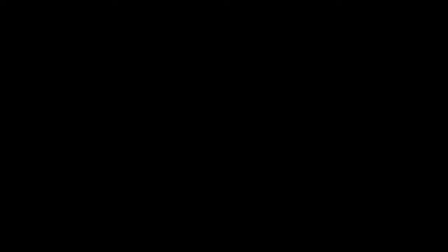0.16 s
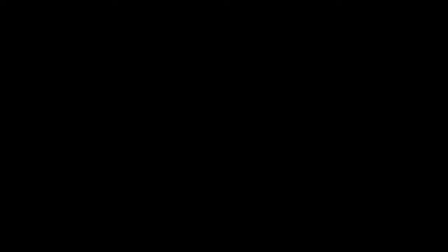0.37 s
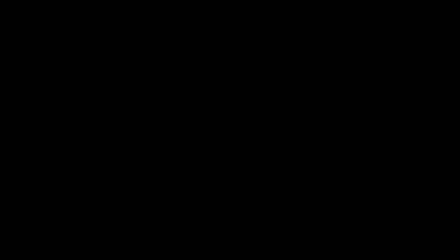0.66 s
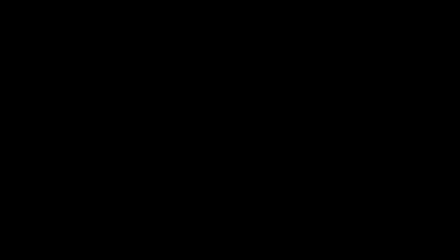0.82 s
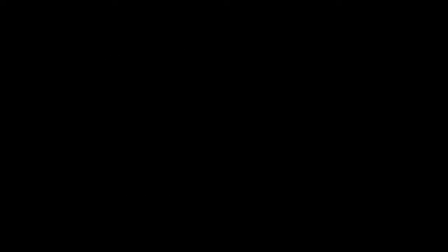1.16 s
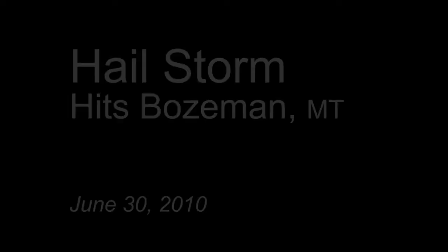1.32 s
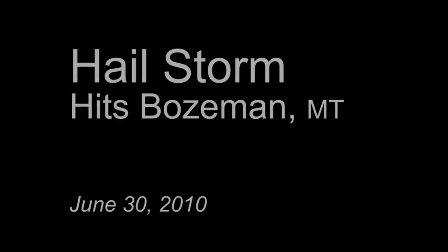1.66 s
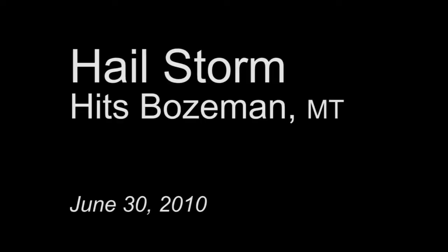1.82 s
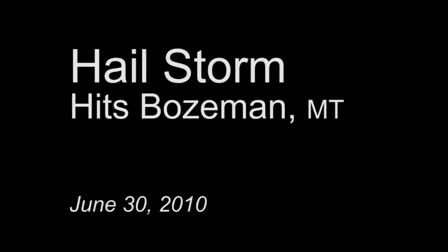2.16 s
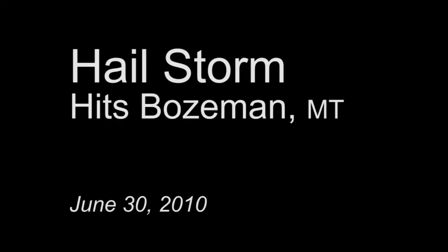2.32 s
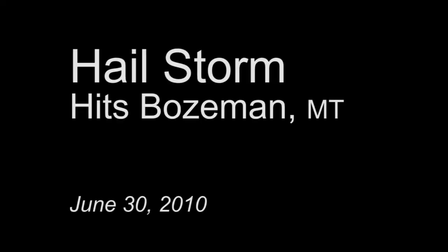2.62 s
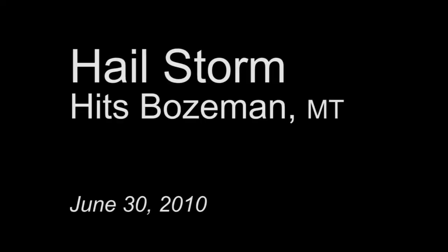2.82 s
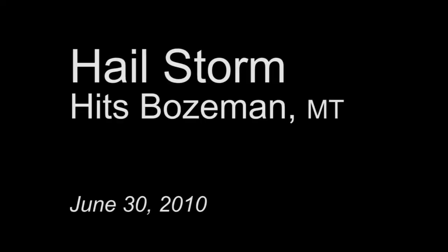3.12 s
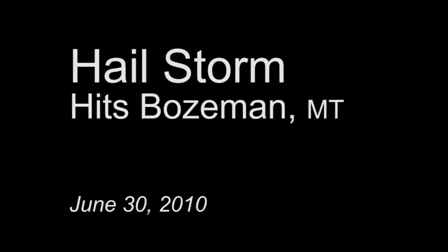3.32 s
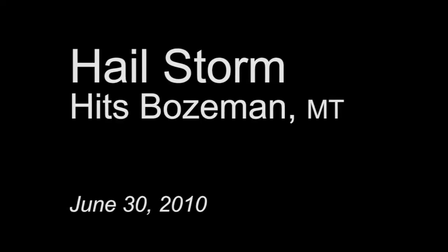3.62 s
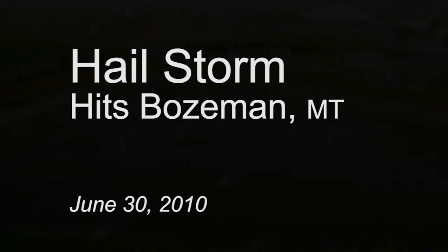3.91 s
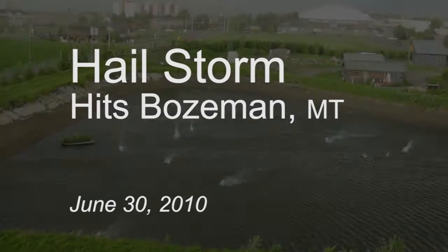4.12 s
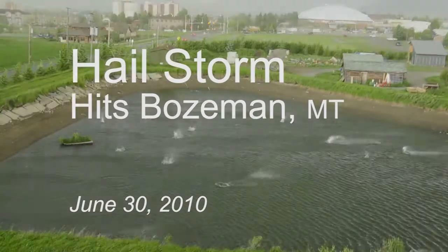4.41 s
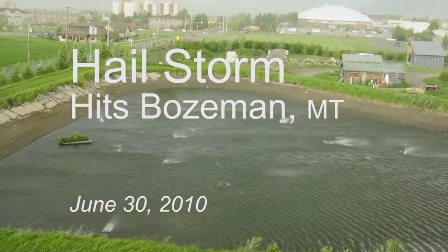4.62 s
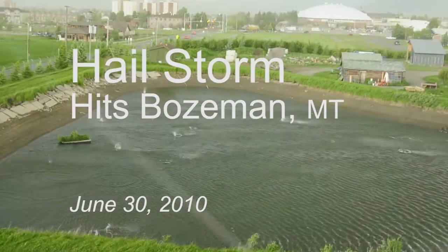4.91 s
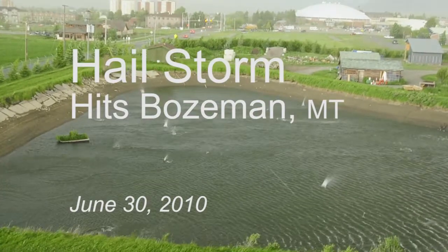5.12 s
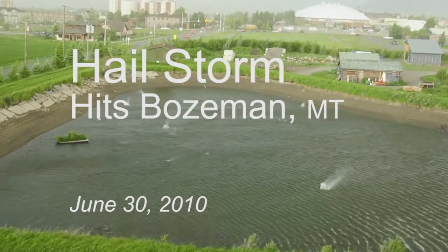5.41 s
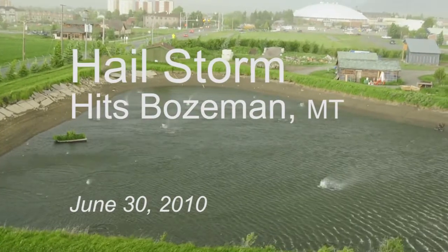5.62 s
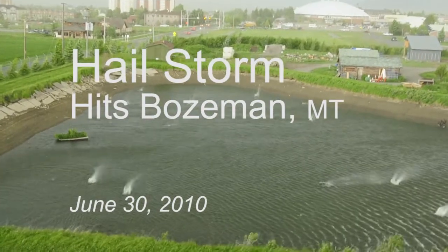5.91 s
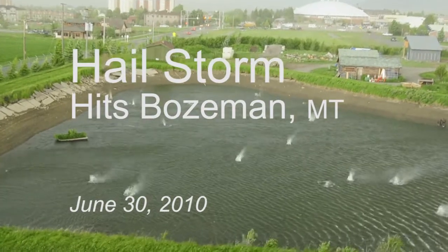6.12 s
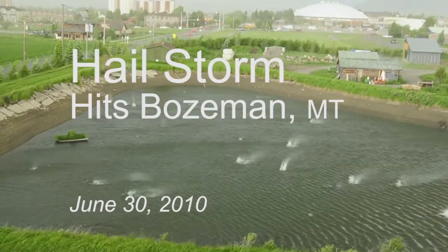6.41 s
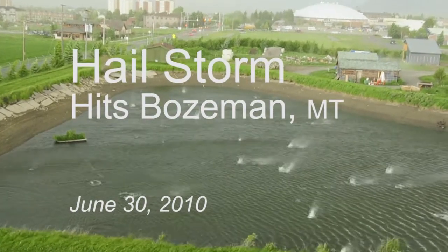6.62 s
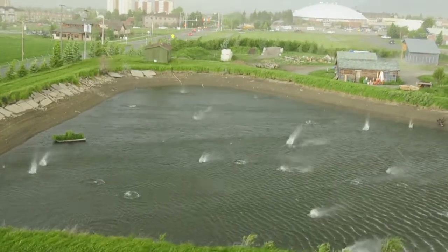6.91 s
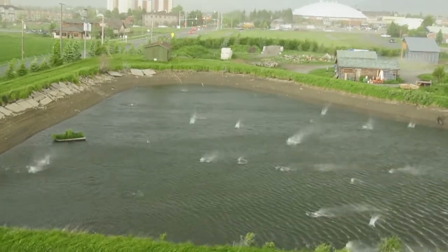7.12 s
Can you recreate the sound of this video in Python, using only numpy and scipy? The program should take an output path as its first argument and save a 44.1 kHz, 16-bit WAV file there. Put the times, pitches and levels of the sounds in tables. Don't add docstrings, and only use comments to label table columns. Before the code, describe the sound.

Large hailstones bang irregularly on a ringing sheet-metal roof overhead, over low rumbling wind and a soft distant patter of hail, the loudest hits distorting.

```python
import sys
import numpy as np
from scipy import signal
from scipy.fft import irfft
from scipy.io import wavfile

SR = 44100
rng = np.random.default_rng(int(sys.argv[2]) if len(sys.argv) > 2 else 0)


def pcm_store(signal):
    levels = np.round(np.clip(np.atleast_2d(signal), -1, 1) * 32767)
    wavfile.write(sys.argv[1], SR, levels.astype(np.int16).T)


def elevation(decibels):
    levels = np.asarray(decibels, float)
    return 10 ** (levels / 20)


N = 320166
STEP = 32
TIME = np.arange(N // STEP + 2) * STEP / SR
BANDS = np.geomspace(22, 6600, 34)
CENTRES = np.sqrt(BANDS[1:] * BANDS[:-1])

# time in seconds, wind rumble in dB, far hail in dB.
STORM = [(0.0, -26.5, -39.5), (0.399, -29.5, -49), (1.25, -22, -37.5), (1.9, -25, -38), (2.47, -22, -36),
         (3.09, -25.5, -45.5), (3.48, -22.5, -46), (3.78, -23.5, -42), (4.16, -19.5, -33), (4.45, -23, -42),
         (4.65, -20.5, -35), (5.05, -24, -36), (5.5, -23, -45), (5.9, -21.5, -35.5), (6.35, -18.5, -37),
         (6.61, -22.5, -30.5), (6.981, -20.5, -42), (7.26, -23.5, -37)]
# frequency in Hz, density in dB per Hz.
RUMBLE = [(15, -51.5), (25, -10), (97, -12), (146, -3), (209, -4), (280, 0.5), (338, 0.5), (375, -2.5),
          (452, -2), (682, -8), (824, -11.5), (1500, -20), (1950, -52.5), (3300, -120)]
# frequency in Hz, density in dB per Hz.
FAR_HAIL = [(710, -36.5), (1200, -4), (2350, -4), (3860, -20), (4820, -35), (5260, -40.5), (6840, -77),
            (11600, -120)]
# start in seconds, peak in dB, brightness in
# dB per octave.
FAINT = [(0.0376, -26, 12), (0.2523, -27, -3.5), (0.6574, -30, 0.6), (0.9904, -20.5, 7), (1.127, -27.5, 2),
         (1.1513, -21, 4), (1.7494, -16, -3.5), (1.813, -32, 3), (1.849, -30.5, 0), (2.0176, -27.5, -4.5),
         (2.0482, -23, 1), (2.1201, -30, 13), (2.1824, -20, -9), (3.1786, -28, -11.5), (3.2011, -17, -9),
         (3.706, -21, -11.5), (3.721, -21, -1), (3.813, -19.5, 2), (3.9544, -26.5, -10), (5.0399, -23, -14),
         (5.0699, -17.5, -8), (5.144, -25.5, -1), (5.261, -18, -4), (5.7628, -35, -9), (6.4388, -22, -16),
         (6.7431, -26, -10), (6.77, -18, -8), (6.822, -22, -6.5), (6.8568, -16, -2.5), (7.173, -20, -12)]
# start in seconds, peak in dB, brightness in dB per octave, ring t60 in seconds.
NEAR = [(0.3591, 1, 9, 0.34), (1.1921, 1, 3, 0.37), (1.4457, -12, 0, 0.33), (1.5599, -0.8, 0, 0.38),
        (2.385, -4.5, -4, 0.25), (2.4438, 0, 8, 0.37), (2.468, 1, 2.4, 0.27), (2.884, -6, -0.87, 0.34),
        (3.265, 3, 5.5, 0.29), (3.5074, -12.5, 3, 0.4), (4.174, -0.5, 12, 0.23), (4.2145, 1, 2, 0.38),
        (4.4448, -4.5, -6.5, 0.32), (4.4927, -8.5, -5, 0.37), (4.582, 5, 1, .19), (5.3281, 13.5, 7.5, 0.11),
        (5.467, 4, 8.2, 0.35), (5.4893, -8.5, -2.5, 0.7), (5.5232, 7.5, 4, 0.24), (6.176, 0.7, 12.5, 0.32),
        (6.2591, -0.6, 11, 0.3), (6.551, 3, 2.5, 0.35), (6.916, -1.9, 2.5, 0.41), (2.8327, -6, -6, 0.27)]
# start in seconds, peak in dB, brightness in dB per octave,
# ring t60 in seconds.
FAR = [(0.7959, -3, 2.1, 0.3), (1.035, -13.5, -3, 0.53), (1.6696, -10, -4.5, 0.3), (2.2643, 4, 4, 0.35),
       (2.2894, -1.3, 6, 0.13), (3.4243, -2, -5.5, 0.14), (3.435, 0.3, -2.5, 0.21),
       (3.7566, -16.5, -1.5, 0.46), (3.9835, 4, -4, 0.28), (4.0612, -11, 4, 0.33), (4.3254, 5, 4.5, 0.31),
       (4.349, -11.5, 17, 0.34), (4.5321, -2, -1.1, 0.53), (4.6904, -11.5, 1.1, 0.2),
       (4.897, -3.5, -5, 0.24), (5.301, -2.2, -0.5, 0.29), (5.3614, -12.5, 3, 0.57),
       (5.8428, -20.5, 21, 0.31), (5.904, -3.5, -1.1, 0.29), (6.0693, 6, -3.5, 0.24),
       (6.1477, -12, 2, 0.36), (6.508, -17.5, -2.5, .21), (7.0285, -12, -2, 0.22)]
# frequency in Hz, density in dB per Hz.
SHEET = [(530, -36.5), (900, -5.5), (1230, -6), (1340, -0.5), (1580, -1.5), (2280, -0.5), (3090, -6),
         (5260, -44.5), (6840, -59), (11600, -120)]
# frequency in Hz, share of the ring t60 as a ratio.
SHEET_DECAY = [(150, 4.75), (500, 1.65), (1200, 0.87), (2300, 0.99), (4000, 0.88), (5400, 0.17)]
# frequency in Hz, density in dB per Hz.
BOOM = [(100, -22.5), (170, -1.5), (350, -1), (700, 1), (1100, -5.5), (1600, -21.5)]
# frequency in Hz, level in dB, t60 in seconds.
PANELS = [(171.7, -30, 0.99), (302.9, -28.5, 0.63), (410.7, -25, 0.36), (679, -28.5, 0.46),
          (1086, -29.5, 0.18), (1786, -22, 0.21), (2140, -32.5, 0.077), (2150, -19.5, 0.2),
          (2307, -21, 0.21), (3040, -30.5, 0.1), (2870, -30, 0.086), (3320, -32, 0.077)]
# start in seconds, level in dB, frequency in Hz, t60 in seconds.
ICE_CHIP = (2.24, -21, 3250, .03)
# start in seconds, peak in dB.
RAFTER = [
    (2.384, -3.5),
    (4.446, -5),
    (4.4915, -7),
]
# start in seconds, level in dB.
CRACKLES = [
    (3.483, -23),
    (6.457, -26),
    (7.252, -23),
]

NEAR_BLOWS = [(*row, 1.37) for row in NEAR]
FAR_BLOWS = [(*row, 4.53) for row in FAR]
FAINT_BLOWS = [(*row, 0.17, 4.3) for row in FAINT]
# start in seconds, peak in dB, boom in dB,
# brightness in dB per octave, rise in ms, ring t60 in seconds.
STONES = [(s, db, -12.5 - 0.041 * bright - 0.07 * db, bright, rise_ms, t60)
          for s, db, bright, t60, rise_ms in NEAR_BLOWS + sorted(FAR_BLOWS + FAINT_BLOWS)]


def at_hz(points, hz):
    known_hz, value = np.array(points).T
    return np.interp(np.log(hz), np.log(known_hz), value)


def drift(rate_hz, count=1):
    settle = 2000
    r = np.exp(-2 * np.pi * STEP * rate_hz / SR)
    white = rng.standard_normal((count, len(TIME) + settle))
    slow = signal.lfilter([1], [1, -2 * r, r * r], white)[:, settle:]
    return slow / slow.std(axis=1, keepdims=True)


def ring(clicks, hz, t60):
    r = elevation(-60 / (t60 * SR))
    w = 2 * np.pi * hz / SR
    return signal.lfilter([0, np.sin(w)], [1, -2 * r * np.cos(w), r * r], clicks + 1e-18)


def band_power(spectrum, tilt_db=0):
    density = elevation(2 * (at_hz(spectrum, CENTRES) + tilt_db))
    return density / (density @ np.diff(BANDS)) * SR / 2


def noise_bands(power):
    white, out = rng.standard_normal((2, N)), 0
    for k, edge in enumerate(zip(BANDS, BANDS[1:])):
        bandpass = signal.butter(2, edge, "band", fs=SR, output="sos")
        band = signal.sosfilt(bandpass, white[k % 2])
        out = out + band * np.interp(np.arange(N) / STEP, np.arange(len(TIME)), np.sqrt(power[k]))
    return out


def storm(rumble_patchy_db=1.5, hail_patchy_db=0.5):
    s, *controls = np.transpose(STORM)
    wind_db, hail_db = (np.interp(TIME, s, c) for c in controls)
    gusts = rumble_patchy_db * (0.55 * drift(10.0) + drift(13, count=len(CENTRES)))
    patter = hail_patchy_db * (drift(18) + 0.7 * drift(25, count=len(CENTRES)))
    rumble = band_power(RUMBLE)[:, None] * elevation(2 * (wind_db + gusts))
    far_hail = band_power(FAR_HAIL)[:, None] * elevation(2 * (hail_db + patter))
    return rumble + far_hail


def arrival_s(hz):
    spread_s = 0.026
    return spread_s * (1 / np.sqrt(np.maximum(hz, 900) / 1000) - 1 / np.sqrt(4.5))


def first_waves(wave_db=6.0):
    size, lead_s = 4096, 1 / 200
    out = np.zeros(N + size)
    hz = np.maximum(np.arange(size // 2 + 1) * SR / size, 1)
    turns = np.cumsum(arrival_s(hz)) * SR / size
    luck = rng.random((len(STONES), 3))
    for (s, db, boom_db, bright, rise_ms, t60), u in zip(STONES, luck):
        first_edge = 0.5 * np.exp(-2j * np.pi * hz * (0.002033 + 0.003 * u[0]))
        second_edge = -0.35 * np.exp(-2j * np.pi * hz * (0.0084 + 0.0091 * u[1]))
        colour = elevation(at_hz(SHEET, hz) + (0.88 * bright + 6.0) * np.log2(hz / 2300))
        path = np.clip(0.82 + 0.15 * bright, 0.1, 0.7)
        chirp = np.exp(-2j * np.pi * (path * turns + hz * lead_s + u[2]))
        wave = irfft(colour * (1 + first_edge + second_edge) * chirp)
        at = round((s - lead_s) * SR)
        peak_db = db + wave_db - 2.17 * rise_ms
        out[at:at + size] += wave / np.abs(wave).max() * elevation(peak_db)
    return out[:N]


def sheet_ring(ring_db=-9.5, boom_gain_db=-3.5, early_db=4.0, late_db=-29.5, spotty_db=2.0, rattle_db=1.67):
    power = np.zeros((len(CENTRES), len(TIME)))
    spots = rng.standard_normal((len(STONES), len(CENTRES)))
    for (s, db, boom_db, bright, rise_ms, t60), spot in zip(STONES, spots):
        a = int(s * SR / STEP) - 20
        span = slice(a, a + int(0.9 * SR / STEP))
        lead = 0.028 * arrival_s(CENTRES) - 0.001 - 0.00072 * rise_ms
        age = np.maximum(TIME[span] - s - lead[:, None], 0)
        rise_s = max(rise_ms, 0.2) / 1000 + 3.04 / CENTRES[:, None]
        swell = (1 - np.exp(-age / rise_s)) ** 2
        rate = 2 * np.log(1000) / (max(t60, 0.03) * at_hz(SHEET_DECAY, CENTRES))[:, None]
        dying = np.exp(-rate * age)
        dying = dying + elevation(2 * early_db) * np.exp(-4.5 * rate * age)
        dying = dying + elevation(2 * late_db) * np.exp(-age / 0.029)
        sheet = band_power(SHEET, bright * np.log2(CENTRES / 2300)) * elevation(2 * ring_db)
        boom = band_power(BOOM) * elevation(2 * (boom_db + boom_gain_db))
        blow = (sheet + boom) * elevation(2 * (db + spotty_db * spot))
        power[:, span] += blow[:, None] * swell * dying
    rattle = drift(27, count=len(CENTRES)) + 0.83 * drift(60)
    return power * elevation(2 * rattle_db * rattle)


def panels():
    rows, out = np.array(STONES), np.zeros(N)
    strength_db = rng.normal(0, 3.5, (len(rows), len(PANELS)))
    for (hz, level_db, t60), luck_db in zip(PANELS, strength_db.T):
        clicks = np.zeros(N)
        at = ((rows[:, 0] + arrival_s(hz)) * SR).astype(int)
        clicks[at] = elevation(rows[:, 1] + level_db + luck_db)
        out += ring(clicks, hz, t60)
    return out


def ice_chip():
    s, db, hz, t60 = ICE_CHIP
    click = elevation(db) * (np.arange(N) == round(s * SR))
    return ring(click, hz, t60)


def knocks():
    echo_s, echo_db = 0.017, 0
    clicks = np.zeros(N)
    for s, db in RAFTER:
        clicks[round(s * SR)] = elevation(db)
        clicks[round((s + echo_s) * SR)] = -elevation(db + echo_db)
    soft_clicks = signal.lfilter([0.15], [1, -0.85], clicks)
    return ring(soft_clicks, hz=716, t60=0.03)


def crackles():
    out = np.zeros(N)
    for s, db in CRACKLES:
        out[round(s * SR)] += elevation(db)
    return out


def scene():
    noise = noise_bands(storm() + sheet_ring())
    return (noise + first_waves() + panels() + ice_chip() + knocks())[None]


def low_pass(x):
    return signal.sosfilt(signal.butter(12, 15900, fs=SR, output="sos"), x)


def record(dry):
    bass_cut = signal.butter(2, 54, "high", fs=SR, output="sos")
    narrow_band = signal.cheby2(14, 70, 6150, fs=SR, output="sos")
    x = signal.sosfilt(narrow_band, signal.sosfilt(bass_cut, dry))
    x = np.clip(x[:, ::4], -0.75, 0.75)
    smoothing = signal.firwin(193, 5400, window=("kaiser", 6.5), fs=SR)
    x = signal.resample_poly(x, 4, 1, axis=1, window=smoothing)[:, :N]
    x = np.clip(x, -0.995, 0.995)
    return low_pass(x + crackles())


dry = scene()
out = record(dry)
pcm_store(out)
```